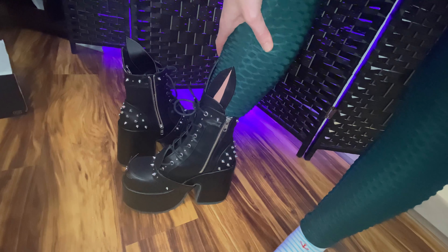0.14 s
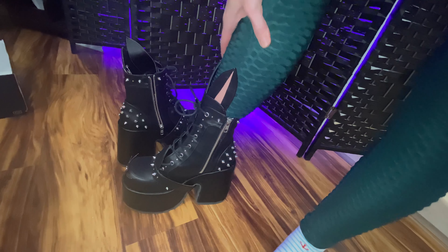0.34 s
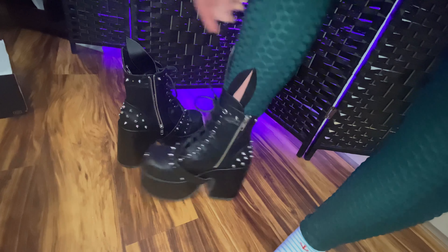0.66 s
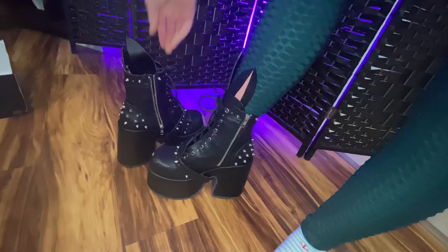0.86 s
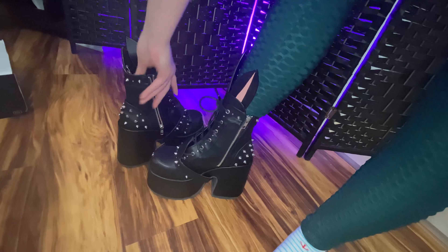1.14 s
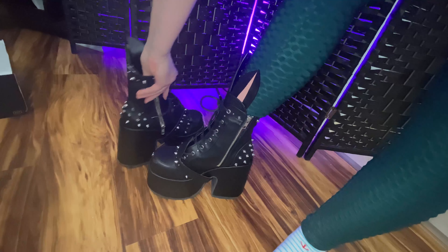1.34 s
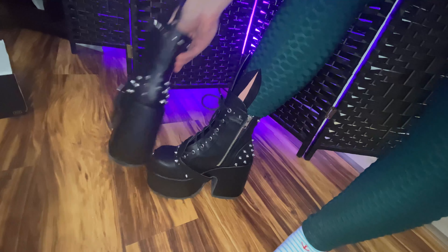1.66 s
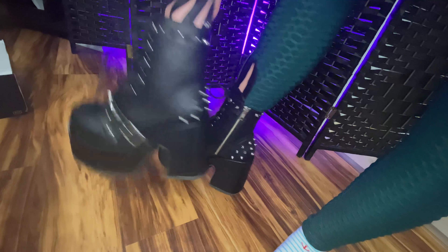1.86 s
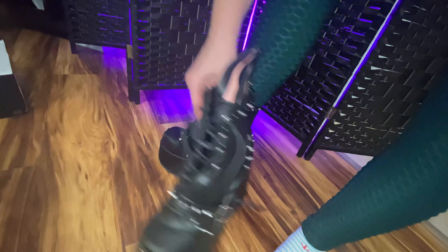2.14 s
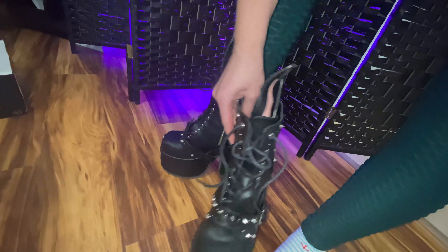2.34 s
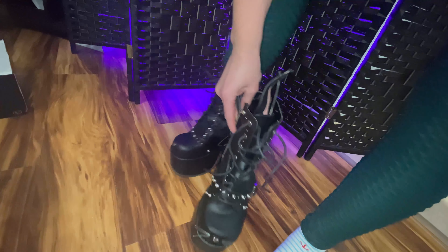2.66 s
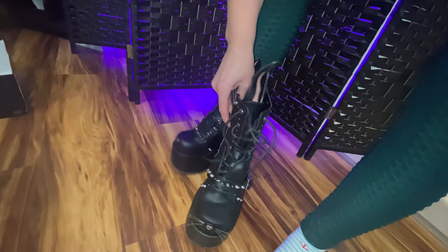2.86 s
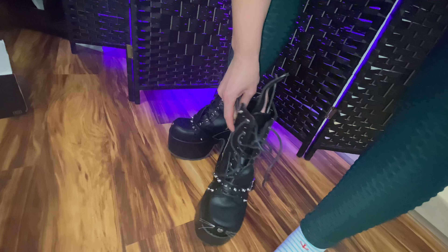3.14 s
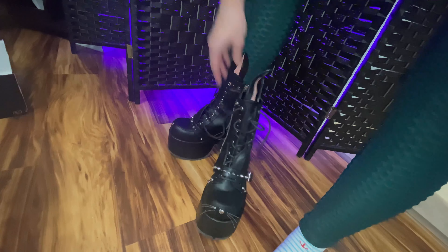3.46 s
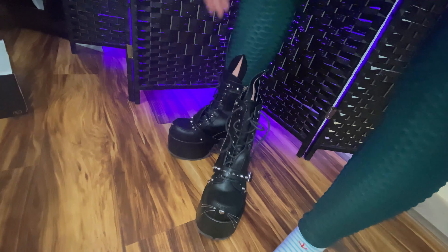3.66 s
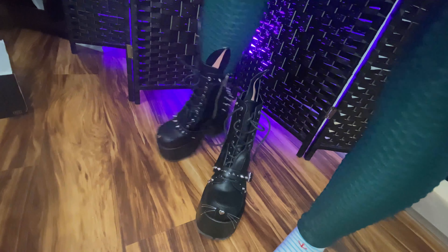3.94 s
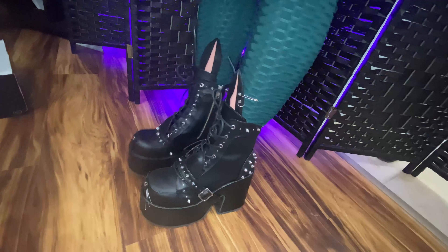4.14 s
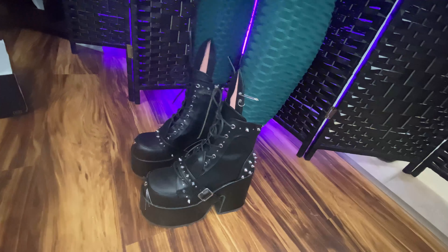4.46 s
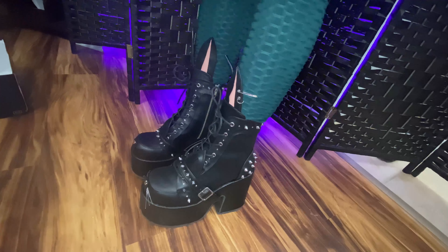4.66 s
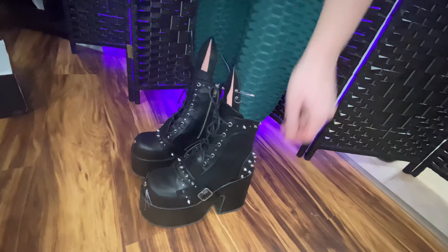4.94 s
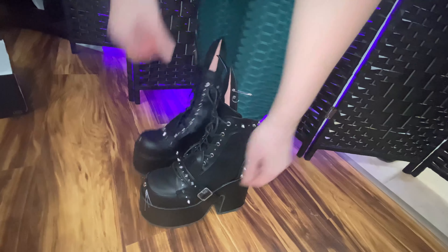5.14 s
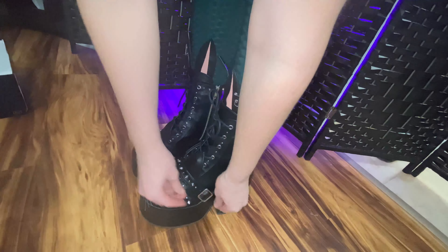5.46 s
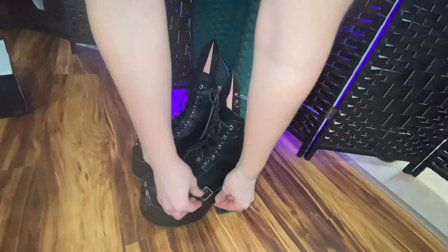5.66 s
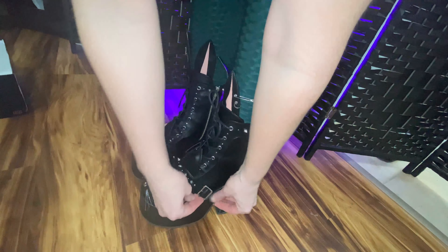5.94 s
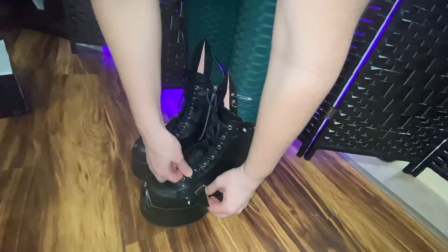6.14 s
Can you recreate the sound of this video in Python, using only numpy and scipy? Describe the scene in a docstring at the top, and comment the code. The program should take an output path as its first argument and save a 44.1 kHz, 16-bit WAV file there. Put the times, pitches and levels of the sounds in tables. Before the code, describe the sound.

Chunky boots are moved about on floorboards, recorded near with a short room tail. First comes quiet fabric rustle and a modest knock, then a run of light hollow taps as one boot is lifted. Scuffs and ticks cluster as it is put down. After a pause, low creaks lead to two strong woody stamps, another creak and a weaker thump, over soft hum.

```python
"""A low ventilation hum, noise in bands, lies under a small furnished room; leather and cloth rub from the start.
Heavy platform boots are shifted and set down from 0.7 s: ringing sole and board modes, with ticks of filtered noise.
From 1.3 s the hollow soles tap and metal studs chink; more scuffs and set-downs cluster around 3.3 s.
From 4.2 s stick-slip pulses creak ahead of stamps near 4.4, 5.2 and 5.8 s, which thud into the wooden floor.
Blows, ticks and creaks also feed a short noise tail of the room."""
import sys
import numpy as np
from scipy import signal
from scipy.fft import rfft, irfft, next_fast_len
from scipy.io import wavfile

SR = 44100
rng = np.random.default_rng(int(sys.argv[2]) if len(sys.argv) > 2 else 0)


def generate_wav(sig):
    """Save sig (samples, or channels by samples) to the path in sys.argv[1] as 16-bit PCM at SR."""
    pcm = np.round(np.clip(np.atleast_2d(sig).T, -1, 1) * 32767).astype(np.int16)
    wavfile.write(sys.argv[1], SR, pcm)


N = 277389  # length [samples]


def amp(db):
    """Turns dB into linear gain."""
    return 10 ** (np.asarray(db) / 20)


def rms_one(x):
    """Scales a signal to an RMS of 1."""
    return x / np.sqrt(np.mean(x ** 2) + 1e-20)


def at_hz(points, hz):
    """Reads a table on a log-frequency axis."""
    table_hz, values = np.array(points).T
    return np.interp(np.log(hz), np.log(table_hz), values)


def band(x, low_hz, high_hz):
    """Band-passes a signal."""
    sos = signal.butter(2, [low_hz, min(high_hz, .45 * SR)], "band", fs=SR, output="sos")
    return signal.sosfilt(sos, x + 1e-18)


def drift(rate_hz):
    """Slow random wander of RMS 1: noise through a two-pole low-pass, made at every 40th sample."""
    r = np.exp(-80 * np.pi * rate_hz / SR)
    slow = signal.lfilter([1], [1, -2 * r, r * r], rng.standard_normal(N // 40 + 2002))[2000:]
    return np.interp(np.arange(N) / 40, np.arange(len(slow)), rms_one(slow))


def fine(coarse):
    """Fills in a control given at every 32nd sample."""
    return np.interp(np.arange(N) / 32, np.arange(len(coarse)), coarse)


RISE_DB = 39  # climb of every gesture over its rise time


def swell(full_s, rise_s, hold_s, db, fade_db_per_s):
    """Gain of one gesture at every 32nd sample: rises, holds, fades, all straight in dB."""
    t = np.arange(0, N + 32, 32) / SR - full_s
    rise_db = RISE_DB * np.minimum(t, 0) / rise_s
    fade_db = fade_db_per_s * np.maximum(t - hold_s, 0)
    return amp(db + rise_db - fade_db)


def bands(size, likeness, low_hz, high_hz):
    """Yields third-octave bands of stereo noise with their centres, as alike left and right as the table says."""
    edges = 25 * 2 ** np.arange(0, 9.5, 1 / 3)
    white = rng.standard_normal((2, 2, size + 4000))
    for k, (low, high) in enumerate(zip(edges, edges[1:])):
        hz = np.sqrt(low * high)
        if low_hz < hz < high_hz:
            mid, side = band(white[k % 2], low, high)[:, -size:]   # the filter is run in
            c = np.clip(at_hz(likeness, hz), 0, 1)
            yield hz, np.sqrt(1 + c) * mid + np.sqrt(1 - c) * side * [[1], [-1]]


# stereo image of diffuse sound: (frequency [Hz], left-right likeness [0..1])
DIFFUSE_LIKENESS = [(50, 0.93), (130, 0.77), (300, 0.055), (700, 0.019), (3000, 0.018), (8000, 0.11)]
# spectrum of the ventilation: (frequency [Hz], relative level per Hz [dB])
HUM_SPECTRUM = [(12, -61), (20, -11), (43, -15), (67, -2), (85, -7), (127, 0), (153, -12.5), (228, -10.5),
                (268, -7.5), (360, -19), (446, -10.5), (538, -60), (632, -43), (5380, -45), (12000, -55),
                (15600, -72), (22000, -120)]
HUM_LEVEL_DB = -60.5
# narrow bands in the hum: (centre [Hz], width [Hz], level [dB])
HUM_DRONES = [(54, 11.8, -61.5), (118, 15, -64), (267, 22.7, -65)]


def hum():
    """Broad room tone with three wavering narrow bands of noise."""
    broad = sum(b * amp(at_hz(HUM_SPECTRUM, hz)) for hz, b in bands(N, DIFFUSE_LIKENESS, 0, 12500))
    out = amp(HUM_LEVEL_DB) * rms_one(broad)
    for hz, width, db in HUM_DRONES:
        mid, side = band(rng.standard_normal((2, N)), hz - width / 2, hz + width / 2)
        out = out + amp(db) * rms_one(mid + 0.23 * side * [[1], [-1]])
    return out


def rubbing(motion, tilt_db, spectrum, likeness, patchy_db, grain_db):
    """Friction noise in patches, studded with small random slips; tilt in dB per octave around 6 kHz."""
    together = drift(34.0)
    slip_now = rng.random(N) < 250.0 / SR   # about 250 slips a second
    slips = slip_now * amp(grain_db * np.minimum(rng.exponential(1, N), 3))
    grain = 1 + signal.lfilter([.15], [1, -amp(-60 / (0.007 * SR))], slips)
    noise = 0
    for hz, b in bands(N, likeness, spectrum[0][0], spectrum[-1][0] + 2000):
        patches_db = patchy_db * (together + 0.32 * drift(29.0))
        noise = noise + b * amp(at_hz(spectrum, hz) + tilt_db * np.log2(hz / 6000) + patches_db)
    return motion * rms_one(grain * noise)


# spectrum of rubbed leather: (frequency [Hz], relative level per Hz [dB])
LEATHER_SPECTRUM = [(180, -83), (300, -8), (427, -9), (560, -6.5), (929, -12), (1130, -12.5), (1970, -19),
                    (5000, -43), (6500, -27.5), (11000, -120)]
# movement of the leather: (time [s], level [dB])
LEATHER_MOVES = [(0.0, -79.5), (0.75, -67), (1.05, -80.5), (1.251, -65), (1.6, -64), (1.75, -73.5),
                 (2.01, -67), (2.31, -55.5), (2.57, -65.5), (3.1, -68.5), (3.27, -54.5), (3.6, -71.5),
                 (4.0, -67), (4.33, -58.5), (4.45, -65), (4.62, -54), (4.8, -71), (5.45, -69.5),
                 (5.62, -60), (5.67, -66.5), (5.79, -54.5), (5.95, -68.5), (6.29, -69.5)]


def leather():
    """Leather rubs as it moves: grainy friction noise under a drawn level curve."""
    motion = amp(np.interp(np.arange(N) / SR, *np.transpose(LEATHER_MOVES)))
    return rubbing(motion, 0, LEATHER_SPECTRUM, DIFFUSE_LIKENESS, patchy_db=1.0, grain_db=6.5)


# rustles, levels before the cloth trim:
# (time of full level [s], rise [s], hold [s], level [dB], fade [dB/s], brightness [dB/octave])
CLOTH_RUSTLES = [(0.21, 0.31, 0.069, -86, 89, 13), (0.495, 0.45, 0.34, -64.5, 320, 4),
                 (1.36, 0.22, 0.02, -63.5, 182, -2), (1.608, .03, 0.12, -77, 81, -4),
                 (2.13, 0.097, 0, -81, 130, 5), (2.324, 0.21, 0.34, -68.5, 192, 0.5),
                 (2.775, 0.074, 0.022, -63.5, 347.5, -2), (2.857, 0.095, 0.044, -62.5, 149, -1.5),
                 (3.161, 0.025, 0.14, -75, 197, 4), (3.314, 0.023, 0.054, -57, 133, -1.5),
                 (3.878, 0.26, 0.0092, -62.5, 44, 2.5), (4.203, 0.41, 0.36, -68, 116.5, 2.5),
                 (4.842, 0.9, 0.12, -66.5, 151, 3.5), (5.394, 0.061, 0.49, -77, 99, 1),
                 (6.172, 0.21, 0, -71, 606, 7.5), (6.254, 0.18, .1, -68.5, 198, 2)]
# sudden flicks, before the same trim: (time of full level [s], level [dB])
CLOTH_FLICKS = [(1.181, -66), (1.253, -70), (1.534, -58.5), (1.988, -58.5), (3.025, -69.5), (3.258, -59),
                (3.516, -65.5), (4.441, -55.5), (4.62, -65.5), (5.194, -59.5), (5.535, -67.5),
                (5.996, -63.5)]
FLICK_RISE_S, FLICK_HOLD_S, FLICK_FADE_DB_PER_S = 0.031, 0.0027, 243


def cloth_motion():
    """Rustles and flicks add in power; brightness is the power-weighted mean, with flicks neutral."""
    flicks = sum(swell(s, FLICK_RISE_S, FLICK_HOLD_S, db, FLICK_FADE_DB_PER_S) ** 2 for s, db in CLOTH_FLICKS)
    power = np.array([swell(*row[:-1]) ** 2 for row in CLOTH_RUSTLES])
    total = power.sum(axis=0) + flicks
    brightness = np.transpose(CLOTH_RUSTLES)[-1] @ power / (total + 1e-30)
    return fine(np.sqrt(total)), fine(brightness)


# spectrum of rubbed cloth before brightness: (frequency [Hz], relative level per Hz [dB])
CLOTH_SPECTRUM = [(1180, 1), (2000, -2.5), (4940, -1.5), (5390, -7), (6640, 0), (7640, -7.5), (10800, -11),
                  (12200, 1), (13300, -27), (14800, -3.5), (16000, -8)]
# stereo image of the cloth: (frequency [Hz], left-right likeness [0..1])
CLOTH_IMAGE = [(2000, 1), (5000, 0.025), (8000, 0.03), (13000, 0.8)]


def cloth():
    """Cloth rustles and flicks: friction noise that brightens and dulls with the gestures."""
    motion, brightness = cloth_motion()
    return amp(5) * rubbing(motion, brightness, CLOTH_SPECTRUM, CLOTH_IMAGE, patchy_db=1.5, grain_db=-24.0)


def struck(t, modes, tilt_db, rise_cycles, damping):
    """Modes set going by one contact: a hard one favours the high modes, low ones take longer to swell."""
    hz, db, t60 = np.transpose(modes)[:, :, None]
    gain = amp(db + tilt_db * np.log2(hz / np.median(hz)) + rng.normal(0, 1.0, hz.shape))
    onset = (1 - np.exp(-t * hz / rise_cycles)) ** 2
    sign = (-1) ** np.arange(len(hz))[:, None]   # neighbours in opposite phase
    decay = amp(-60 * t / (damping * t60))
    return np.sum(gain * onset * sign * np.sin(2 * np.pi * hz * t) * decay, axis=0)


def coloured(x, peaks, ring_db):
    """Adds the broad rings of the struck body."""
    return x + sum(amp(db + ring_db) * band(x, hz - width / 2, hz + width / 2) for hz, width, db in peaks)


PAN_ABOVE_HZ, LEAD_S_PER_DB = 600, 1.2e-5


def sideways(x, pan_db):
    """A blow off to one side: its highs are louder there and the sound arrives earlier; positive is left."""
    low = signal.lfilter(*signal.butter(1, PAN_ABOVE_HZ, fs=SR), x)
    left, right = low + (x - low) * amp([[pan_db / 2], [-pan_db / 2]])
    lead = round(LEAD_S_PER_DB * pan_db * SR)
    return np.array([np.roll(left, max(-lead, 0)), np.roll(right, max(lead, 0))])


# hollow platform sole, decay before the ring factor: (frequency [Hz], relative level [dB], t60 [s])
SOLE_MODES = [(470, -5, 0.013), (686, -2, 0.02), (975, 11.5, 0.0093), (1116, 18.5, 0.0033),
              (1586, 4.5, 0.0054), (1800, -3, 0.013)]
# floorboards and lowest room modes, decay before damping: (frequency [Hz], relative level [dB], t60 [s])
BOARD_MODES = [(62, -6.5, 0.48), (92, -1.5, 0.32), (112.3, 2, 0.18), (184.3, 1.5, 0.21), (270, 2, 0.07),
               (320, -7.5, 0.67), (406, -5, 0.015)]
BOUNCE_S, BOUNCE_DB = 0.00233, -12   # the sole rocks and lands a second time
PUSH_SAG_S, PUSH_T60_S, PUSH_DB = 0.01064, 0.057, 1   # the weight bends the boards
CRACK_SWEEP_HZ, CRACK_FOLLOWS = 5570, 0.4   # the stronger the crack against the knock, the higher it starts


def add_blow(dry, send, s, knock_db, thud_db, crack_db, knock_tilt_db, thud_tilt_db, wet_db, pan_db,
             sole_ring, peaks, ring_db, push_hz):
    """Adds a blow, dry and to the room: sole knocks and cracks, boards thump under the weight and ring on."""
    t = np.arange(SR // 4) / SR
    late = np.maximum(t - .0012, 0)   # the hard sole lands just after the first touch

    # high bending waves arrive first, so the crack falls in pitch
    reach = CRACK_SWEEP_HZ * amp(CRACK_FOLLOWS * np.clip(crack_db - knock_db, -20, 0))
    settle = .0005 * (1 - np.exp(-late / .0005))
    snap = (1 - np.exp(-late / .0003)) * amp(-60 * late / .008)
    crack = snap * np.sin(2 * np.pi * (1400 * late + reach * settle))

    knock = amp(knock_db + 4) * struck(late, SOLE_MODES, knock_tilt_db, rise_cycles=.45, damping=sole_ring)
    knock = knock + amp(BOUNCE_DB) * np.interp(t - BOUNCE_S, t, knock, left=0)

    thump = amp(thud_db + 10.0) * struck(late, BOARD_MODES, thud_tilt_db, rise_cycles=0.51, damping=0.21)
    # the bending boards give a wave that falls in pitch
    turns = push_hz * PUSH_SAG_S * np.log1p(late / PUSH_SAG_S)
    push_gain = amp(thud_db + PUSH_DB + 10 - 60 * late / PUSH_T60_S)
    push_onset = (1 - np.exp(-late * push_hz / .7)) ** 2
    thump = thump + push_gain * push_onset * np.sin(2 * np.pi * turns)
    ringing = amp(thud_db - 17.5) * struck(t, BOARD_MODES, thud_tilt_db, rise_cycles=0.29, damping=1.0)

    direct = sideways(knock + amp(crack_db + 10.0) * crack, pan_db) + thump + ringing
    to_room = knock + amp(crack_db + 16.5) * crack + amp(-6.5) * thump
    here = slice(round(s * SR), round(s * SR) + len(t))
    dry[:, here] += coloured(direct, peaks, ring_db)
    send[here] += amp(wet_db) * coloured(to_room, peaks, ring_db)


# boots set down, scuffed or stamped, levels before the trims in the blow:
# (time [s], knock [dB], thud [dB], crack [dB], hardness [dB/octave], thud hardness [dB/octave],
#  pan to the left [dB], floor ring [dB], first pitch of the bending [Hz])
BOOT_FALLS = [(0.733, -42, -44, -46, -1, 0.5, 1.5, -11.5, 615),
              (0.742, -57, -45.5, -63, -7, -3.5, -21, -1, 284),
              (1.526, -56, -49, -65, -7, -6.5, 13, -23, 328), (2.762, -52, -44, -69, 2, 1.5, -8, -11, 379),
              (3.193, -63, -61, -67, -3, 7, -11, -12, 446), (3.222, -62, -53, -64, -10, 5, -5, -13, 443),
              (3.236, -72, -56, -60, -1, 0, 1, -13, 517), (3.251, -63, -51, -66, -11, 0, -7, -17, 445),
              (3.275, -54, -54.5, -72, 9, -4, -7, -25, 446), (3.306, -48, -48, -49.5, 9, 8, -4, -22, 466),
              (3.313, -39.5, -42, -62, 2, -3.5, -1, -15, 482),
              (3.404, -51.5, -59, -53.5, -11, 11, -7, -24, 490),
              (4.436, -24.5, -32, -26.5, -2.5, 0.5, 5.5, -3, 601),
              (5.185, -22, -37, -28, 1.5, -0.5, 8.5, -11, 564),
              (5.836, -35.5, -48, -47, -2.5, -4.5, 4.5, -6, 496)]
# broad rings of the struck floor, before each fall's ring level: (centre [Hz], width [Hz], level [dB])
FLOOR_RINGS = [(371.5, 66, 6), (843, 86, -2), (1232, 274, 6.5), (2016, 150, 5)]
FALL_ROOM_DB, FALL_SOLE_RING = 1.14, 0.78   # room share; factor on the sole's decay times


def falls(dry, send):
    """Boots land on the boards, each blow coloured by the floor."""
    for s, knock, thud, crack, tilt, thud_tilt, pan, ring_db, push_hz in BOOT_FALLS:
        add_blow(dry, send, s, knock, thud, crack, tilt, thud_tilt, FALL_ROOM_DB, pan,
                 FALL_SOLE_RING, FLOOR_RINGS, ring_db, push_hz)


# decay of the room: (frequency [Hz], t60 [s])
ROOM_DECAY = [(100, 0.36), (400, 0.33), (1300, 0.34), (4000, 0.33), (8000, 0.26), (15000, 0.05)]
# tone of the tail: (frequency [Hz], relative level [dB])
ROOM_TONE = [(100, 3.5), (400, 3), (1250, 0.5), (1600, 0.5), (2100, -6.5), (4500, -2), (7000, 2),
             (15000, -6.5)]


def room(x):
    """A diffuse tail that swells in a few ms and dies band by band, with one strong wall echo."""
    t = np.arange(SR // 2) / SR
    tail = sum(b * amp(at_hz(ROOM_TONE, hz) - 60 * t / at_hz(ROOM_DECAY, hz))
               for hz, b in bands(len(t), DIFFUSE_LIKENESS, 0, SR))
    tail = tail * (1 - np.exp(-t / 0.007))
    tail = tail / np.sqrt(np.sum(tail ** 2) / 2)
    tail[[0, 1], [round(.017 * SR), round(.0165 * SR)]] += .4   # the wall echo, left and right
    return signal.fftconvolve(x[None], tail, axes=1)[:, :N]


LEFT_LEAD_S = 0.00011   # the boots stand nearer the left port


def place(x, pan_db):
    """Direct sound reaches the left port first; positive pan is louder on the left."""
    size = next_fast_len(N + 100)
    turn = np.exp(-2j * np.pi * np.arange(size // 2 + 1) / size * SR * LEFT_LEAD_S)
    left, right = x * np.ones((2, 1))
    right = irfft(rfft(right, size) * turn, size)[:N]
    return np.array([left, right]) * amp([[pan_db / 2], [-pan_db / 2]])


def clicks(times, db):
    """Single-sample clicks at the given times."""
    out = np.zeros(N)
    out[np.round(np.array(times) * SR).astype(int)] = amp(db)
    return out


def burst(x, t60):
    """Each click lets off a puff of dying white noise."""
    return signal.lfilter([1], [1, -amp(-60 / (t60 * SR))], x + 1e-18) * rng.standard_normal(N)


# dry ticks of laces and leather, levels before filtering and trim:
# (time [s], thin level [dB], body level [dB], body pitch [Hz])
LACE_TICKS = [(0.7582, -51, -75, 2500), (0.795, -56, -53, 2200), (0.841, -56, -40, 3260),
              (1.314, -66, -64, 4800), (1.3345, -57, -46, 3780), (1.976, -74, -52, 2780),
              (2.7478, -68, -52.5, 2920), (2.811, -53.5, -49, 2700), (3.021, -73, -46, 3180),
              (3.2536, -50, -37.5, 2560), (3.31, -62, -40, 1710), (3.339, -70, -44, 2780),
              (3.38, -60, -44, 2000), (3.4407, -56, -47.5, 2700), (3.52, -53.5, -51, 1740),
              (3.676, -87, -58, 1270), (4.6263, -56, -69, 2500), (5.526, -61, -50, 1800),
              (5.987, -54.5, -74, 3000)]


def ticks():
    """Laces and leather tick: a thin puff of high noise plus a body of noise around its pitch."""
    s, db = np.transpose(LACE_TICKS)[:2]
    out = band(burst(clicks(s, db), .007), 4500, 16000)
    puffs = amp(-60 * np.arange(700) / (.013 * SR)) * rng.standard_normal((len(LACE_TICKS), 700))
    puffs[:, 0] = 3   # each starts with a snap
    for (s, _, body_db, hz), noise in zip(LACE_TICKS, puffs):
        out[round(s * SR):][:700] += amp(body_db) * band(noise, hz / 1.5, hz * 1.5)
    return amp(9) * out


# hollow soles tapping each other or a finger, levels before the trims in the blow:
# (time [s], knock level [dB], hardness [dB/octave], room share [dB])
SOLE_TAPS = [(1.335, -44.5, 2.5, -1.5), (1.942, -47.5, 1.5, 2.5), (2.102, -61.5, -9, 10.5),
             (2.164, -53, -4, -15), (2.195, -48, -9.5, -7), (2.288, -46, -13, -3.5),
             (2.313, -50.5, -12, -10), (2.375, -47.5, -9.5, -2.5), (2.421, -44.5, -7.5, -4.5),
             (2.573, -59.5, -5, -3), (2.636, -59, -5, 1), (4.624, -70.5, -8, 21), (4.945, -74.5, 4, 24.5),
             (5.493, -66.5, -9, -14)]
# broad ring of the lifted, hollow boot: (centre [Hz], width [Hz], level [dB])
BOOT_RINGS = [(613, 246, -0.5)]
TAP_THUD_DB, TAP_CRACK_DB = -10, -8.5   # against the knock level in the table
TAP_THUD_TILT_DB, TAP_PAN_DB = 10, 2.5   # thud hardness per octave; pan to the left
TAP_SOLE_RING, TAP_PUSH_HZ = 1.12, 465   # factor on the sole's decay times; first pitch of the bending


def taps(dry, send):
    """Hollow soles tap: the same blow as a fall, coloured by the lifted boot."""
    for s, db, tilt, wet in SOLE_TAPS:
        add_blow(dry, send, s, db, db + TAP_THUD_DB, db + TAP_CRACK_DB, tilt, TAP_THUD_TILT_DB, wet, TAP_PAN_DB,
                 TAP_SOLE_RING, BOOT_RINGS, 0, TAP_PUSH_HZ)


def ring(x, hz, t60):
    """A unit click sets a sine of height 1 ringing."""
    r, w = amp(-60 / (t60 * SR)), 2 * np.pi * hz / SR
    return signal.lfilter([0, np.sin(w)], [1, -2 * r * np.cos(w), r * r], x + 1e-18)


# metal studs touching, levels before the modes: (time [s], level [dB])
STUD_CLINKS = [(1.5444, -51.5), (4.625, -60)]
# modes of a stud: (frequency [Hz], relative level [dB], t60 [s])
STUD_MODES = [(4270, -3, .02), (7240, -6, 0.055), (11370, -4, 0.027)]


def studs():
    """Metal studs touch: short puffs of noise set their few modes ringing."""
    s, db = np.transpose(STUD_CLINKS)
    return sum(ring(burst(clicks(s, db + level_db - 0.5), 0.003), hz, t60) for hz, level_db, t60 in STUD_MODES)


# the sole creaks as it drags on the boards:
# (time of full level [s], hold [s], level [dB], mean slip rate before waver [Hz])
SOLE_CREAKS = [(4.178, 0.013, -65, 254.8), (4.262, 0.068, -58.5, 283.4), (5.605, 0.015, -69.5, 262),
               (5.75, 0.022, -61.5, 279.7)]
CREAK_RISE_S, CREAK_FADE_DB_PER_S, CREAK_WAVER, CREAK_TOP_HZ = 0.16, 203, .035, 1430


def creaks():
    """Stick and slip: uneven pulses at a wavering rate, dull on top."""
    waver = 1 + CREAK_WAVER * drift(25.0)
    sizes = -amp(3.1 * rng.standard_normal(N))
    out = 0
    for s, hold_s, db, hz in SOLE_CREAKS:
        slips = np.diff(np.floor(np.cumsum(hz * waver / SR)), prepend=0) * sizes
        gain = fine(swell(s, CREAK_RISE_S, hold_s, db, CREAK_FADE_DB_PER_S))
        out = out + gain * rms_one(band(slips, 190.0, CREAK_TOP_HZ))
    return out


def scene():
    """Boots and small parts, dry and in the room, over rustle and hum."""
    air, hide, fabric = hum(), leather(), cloth()
    blows, blow_send = np.zeros((2, N + SR // 4)), np.zeros(N + SR // 4)   # space for the last blow
    falls(blows, blow_send)
    tick = ticks()
    taps(blows, blow_send)
    stud, creak = studs(), creaks()
    send = blow_send[:N] + amp(-13) * tick + creak
    wet = amp(-3.5) * room(send) * amp([[1.2], [-1.2]])
    near = amp(1.0) * place(blows[:, :N], pan_db=2.5) + place(tick + stud + fabric, pan_db=1.0)
    return near + place(hide + creak, pan_db=3.5) + wet + air


CUTOFF_HZ = 16350


def record(dry):
    """The microphone drops the deepest bass; the top is cut steeply."""
    dry = signal.sosfilt(signal.butter(2, 46, "high", fs=SR, output="sos"), dry)
    return signal.sosfilt(signal.cheby2(16, 60, CUTOFF_HZ, fs=SR, output="sos"), dry)


dry = scene()
out = record(dry)
generate_wav(out)
```